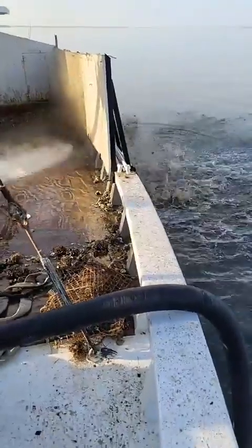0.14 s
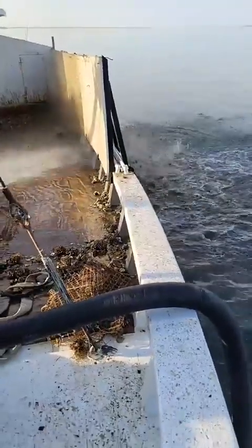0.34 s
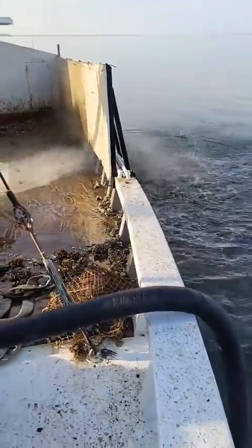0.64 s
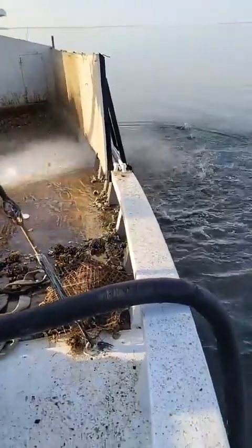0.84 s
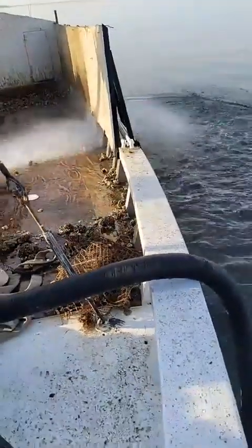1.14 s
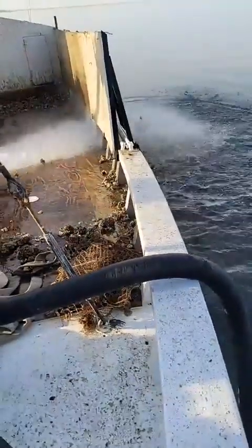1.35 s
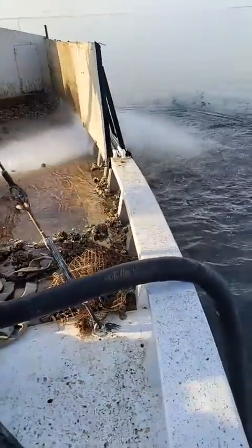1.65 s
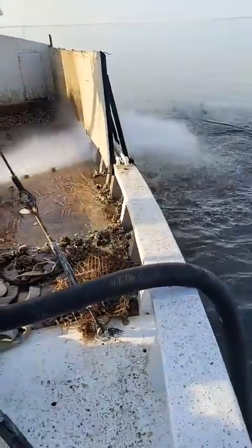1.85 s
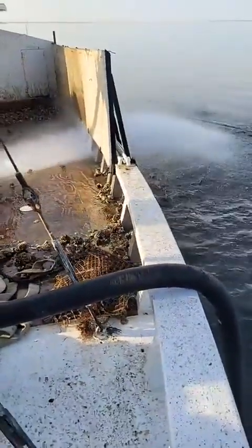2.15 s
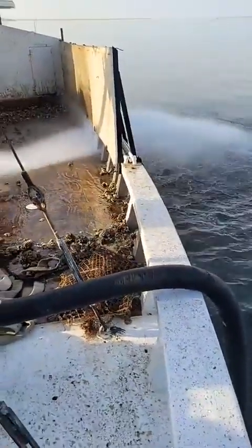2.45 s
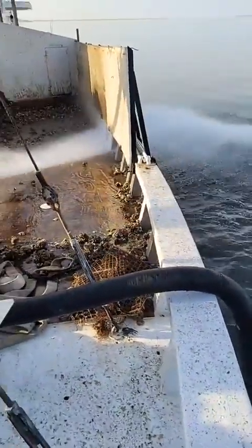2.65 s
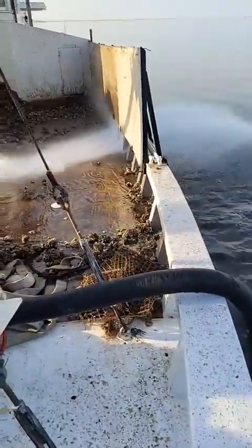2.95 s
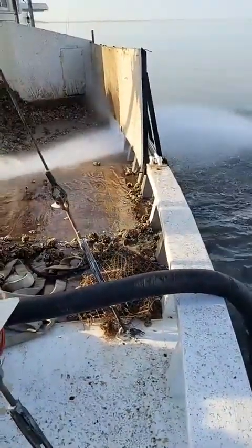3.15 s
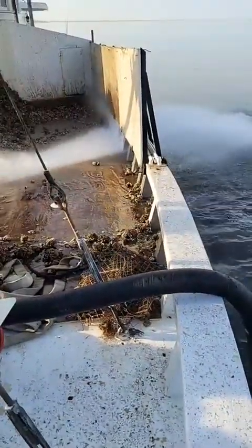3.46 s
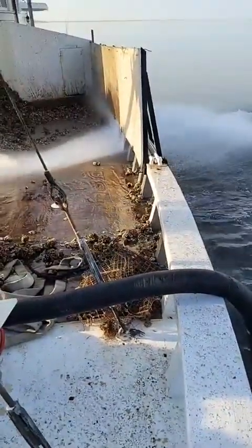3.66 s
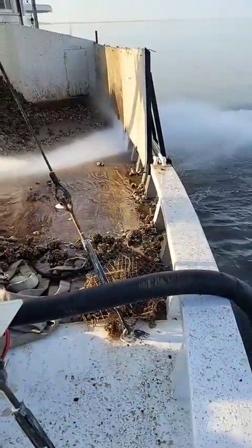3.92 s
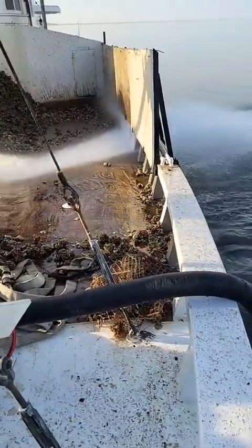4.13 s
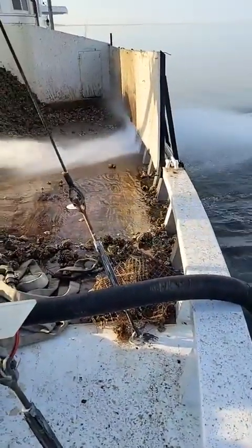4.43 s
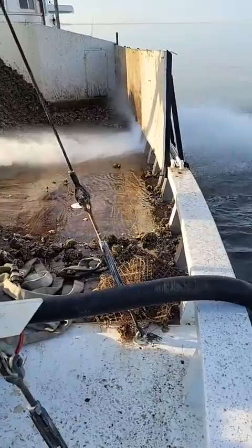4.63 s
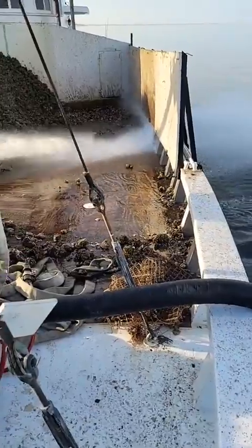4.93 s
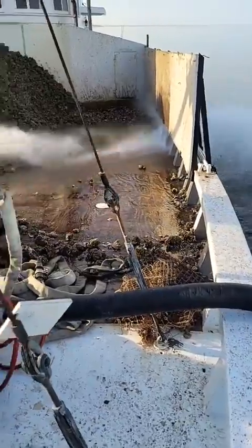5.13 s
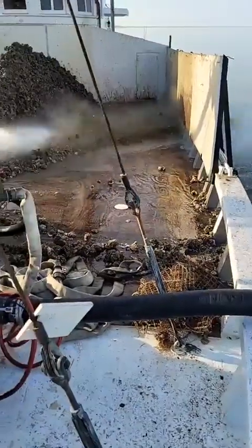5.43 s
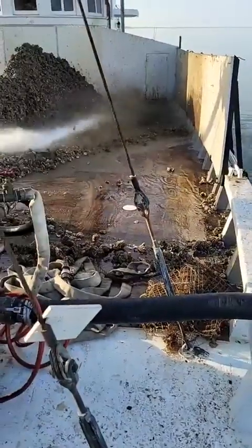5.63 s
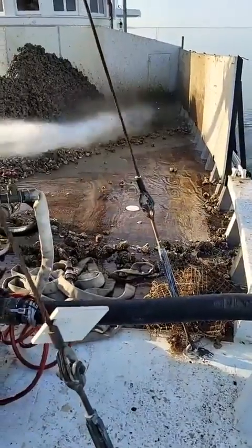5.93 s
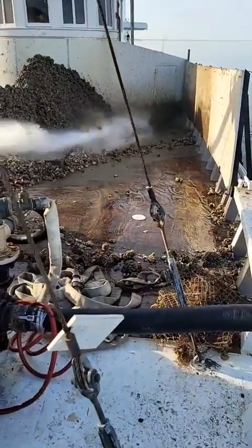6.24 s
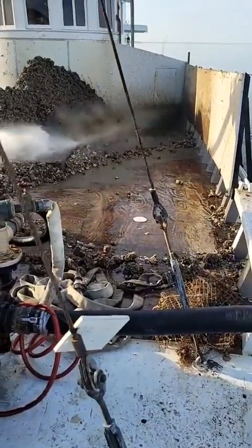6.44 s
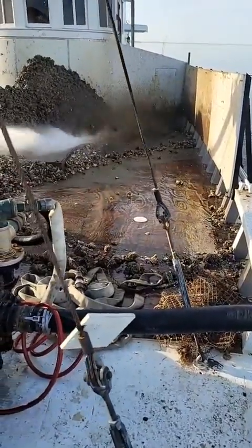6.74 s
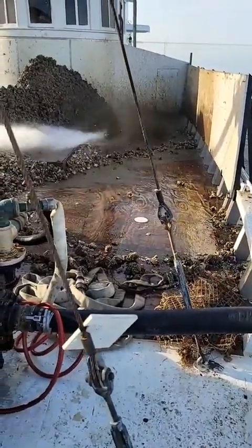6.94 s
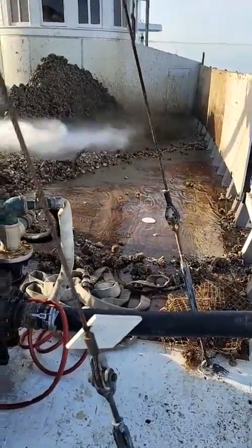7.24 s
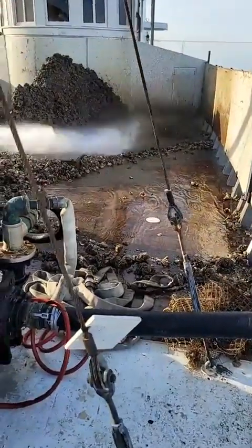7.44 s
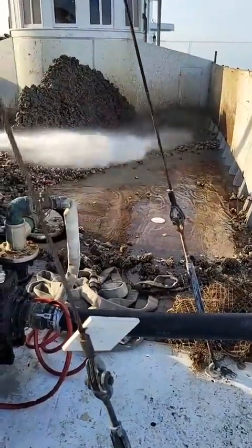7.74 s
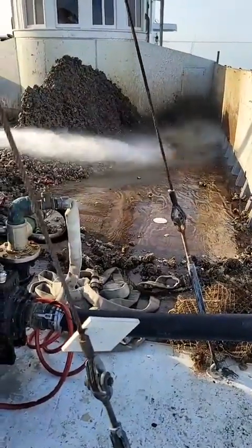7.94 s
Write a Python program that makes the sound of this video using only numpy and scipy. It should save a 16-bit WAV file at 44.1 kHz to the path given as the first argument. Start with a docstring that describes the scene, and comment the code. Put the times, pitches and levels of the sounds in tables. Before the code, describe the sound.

A deck diesel pump sags, surges back to a steady fast throb, while a high-pressure water jet hisses across steel and shells rattle.

```python
"""A four-cylinder diesel drives a deck pump: it sags, recovers to an idle, revs up under load, then runs steadily.
From the start the exhaust throbs in shaft orders, each firing gates the exhaust roar and clatters in the
block, and the water jet hisses across the steel deck in coloured noise that pulses with the pump drive.
After the rev-up a narrow band of noise whistles along the jet, and later a band of grainy noise rises
as the shells swept by the jet rattle over the deck."""
import sys
import numpy as np
from scipy import signal
from scipy.fft import rfft, irfft, next_fast_len
from scipy.io import wavfile
from scipy.ndimage import uniform_filter1d

SR = 44100
rng = np.random.default_rng(int(sys.argv[2]) if len(sys.argv) > 2 else 0)


def decibels_to_gain(level_db):
    """Convert a level in decibels to a linear amplitude gain (20 dB per decade)."""
    exponent = np.asarray(level_db, float) / 20
    return 10 ** exponent


def generate_wav(sig):
    """Save sig (samples, or channels by samples) to the path in sys.argv[1] as 16-bit PCM at SR."""
    pcm = np.round(np.clip(np.atleast_2d(sig).T, -1, 1) * 32767).astype(np.int16)
    wavfile.write(sys.argv[1], SR, pcm)


N = 356328

# Engine speed. Each row: time in seconds, firings a second in Hz.
ENGINE_SPEED = [(0, 55.41), (.08, 52.72), (.34, 42.62), (.4, 39.24), (.5, 43.07), (.65, 46.2), (.8, 46.21),
                (1.19, 45.15), (1.3, 49.46), (1.55, 58.59), (1.7, 62.34), (1.8, 63.04), (2.3, 62.87),
                (3.1, 62.6), (5.4, 62.6), (6.6, 62.42), (8.08, 62.42)]
# Levels of exhaust and jet as heard; both rise together shortly before 3.05 s at a nearly steady speed.
# Each row: time in seconds, exhaust reference level in dB, level of the jet in dB.
HEARD_LEVELS = [(0, -28, -36), (.13, -30, -34), (.4, -32.5, -39.5), (.47, -28.5, -37), (.68, -29, -38.5),
                (.88, -31, -41.5), (1.01, -26, -34.5), (1.1, -23, -34.5), (1.17, -26.5, -34.5),
                (1.24, -19, -26.5), (1.4, -22, -27.5), (1.62, -23.5, -28.5), (1.85, -25, -32.5),
                (2.7, -25, -33), (3.05, -23, -31), (4.9, -23.5, -32.5), (5.3, -23.5, -31),
                (8.08, -23.5, -31.5)]
# The cylinders in firing order. Each row: relative strength of the blow in dB, lateness in firing gaps.
CYLINDERS = [(-7, -.18), (-3.8, -.22), (1.7, -.39), (0, -.37)]
# What the exhaust pipe passes of the firing harmonics. Each row: frequency in Hz, level in dB over the
# exhaust reference, before the load lift and the tilts.
PIPE = [(39, -8), (45, 2.5), (50, 7.5), (56, 8.5), (62, 9.5), (88, 5), (95, 3.5), (102, -8), (111, 2),
        (125, -8.5), (136, -6.5), (149, 1), (165, -4), (187, -5), (197, -12), (228, 2.5), (250, 5.5),
        (270, -3), (312, -10.5), (345, 3), (375, -9.5), (437, -24), (500, -15), (560, -26.5), (625, -16)]
# Orders from unequal cylinders, odd multiples of the engine cycle. Each row: frequency in Hz, level in dB
# over the exhaust reference at full speed, before the load lift and tilt.
PER_CYCLE = [(16, -37), (47, -22), (78, -22), (110, -10), (140, -8.5), (203, -14), (234, -4), (265, -18),
             (297, -10), (330, -10), (360, -21), (420, -18.5), (460, -26.5), (560, -30.5), (610, -19)]
# The same for odd multiples of the shaft turn. Each row: frequency in Hz, level in dB over the reference.
PER_TURN = [(31, -36), (94, -55), (156, -25), (219, -11), (281, -12.5), (344, -11.5), (406, -29.5),
            (470, -22), (600, -33)]
# Unequal orders at low speed. Each row: frequency in Hz, level in dB over the reference, before load lift and tilt.
LUMPY_IDLE = [(30, -28), (56, -11), (75, -27), (105, -14), (150, -15), (190, -19), (235, -13.5),
              (290, -7.5), (350, -8.5), (385, -19), (450, -23)]
# Silencer chambers that delay the orders passing near them. Each row: centre in Hz, half width in Hz.
CHAMBERS = [(70, 45), (227, 65), (381, 43)]
# Colour of the gas roar. Each row: frequency in Hz, relative level in dB per Hz.
ROAR_COLOUR = [(25, -30), (60, -6.5), (110, -1), (190, -6.5), (250, -2.5), (340, 1.5), (420, -10.5),
               (520, -17), (620, -6.5), (700, -7), (765, -3), (810, -10.5), (1200, -15.5), (2500, -35)]
# Colour of the loose block clatter. Each row: frequency in Hz, relative level in dB per Hz.
BLOCK_COLOUR = [(470, -24), (800, -2), (1110, -1.5), (1680, 1), (1840, -3.5), (2090, -3.5), (3210, -14),
                (6110, -15), (7000, -36), (9100, -67), (15400, -120)]
# Ringing parts of the block. Each row: centre in Hz, width in Hz, gain at the centre in dB.
BLOCK_RINGS = [(1184, 41, -12.5), (1688, 114, 3), (2124, 130, -1.5), (4280, 130, -1)]
# Strongest orders that repeat in the clatter. Each row: multiple of the engine cycle, peak in dB over the block.
REPEATING_CLATTER = [(41, -10.5), (44, -12.5), (49, -14), (55, -13.5), (59, -15), (67, -14.5), (68, -20.5),
                     (75, -14), (77, -16.5), (83, -20), (88, -12.5), (93, -14), (109, -14), (126, -15),
                     (130, -13), (136, -19.5)]
# Treble balance of the hiss as heard, with two dips, near 7.4 and 14 kHz, that are not the jet's own.
# Each row: frequency in Hz, relative level in dB per Hz.
HEARD_HISS = [(1350, -27), (2300, -2.5), (3250, -7), (3700, -7.5), (4000, -7.5), (4300, -7), (6080, -11),
              (6750, -14), (7380, -23.5), (9390, -13), (11600, -15.5), (13900, -29), (15100, -22),
              (15700, -19)]
# Details around the jet. Each row: time in seconds, whistle near the nozzle in dB, rattle of swept shells in dB.
WHISTLE_AND_SHELLS = [(0, -62, -52), (1.7, -58, -52), (2.1, -43, -55), (4.9, -46, -45), (5.3, -43, -43),
                      (5.7, -53, -40), (7, -57, -43), (8.08, -57, -42)]
# Faint orders of valve-gear noise, in multiples of the engine cycle: the first, and one past the last.
FAINT_ORDERS = (42, 150)

ORDER_COUNT = 40  # exhaust orders, in multiples of the engine cycle
IDLE_DULL_DB = -2  # per octave: firing harmonics fade at low speed
PULL_BRIGHT_DB = 0.5  # per octave, while the engine pulls
BLOCK_DB = -4.5  # block clatter over the exhaust reference
FAINT_DB, FAINT_SCATTER_DB, FAINT_FALL_DB = -23, 3, -3  # peak over the block; scatter; fall per octave


def unit(x):
    """Scaled to rms 1."""
    return x / np.sqrt(np.mean(x ** 2) + 1e-20)


def curves(rows):
    """One value per sample for each column after the time."""
    s, *cols = np.transpose(rows)
    return [np.interp(np.arange(N) / SR, s, c) for c in cols]


def along(points, hz):
    """(Hz, value) points read on a log axis."""
    f, v = np.transpose(points)
    return np.interp(np.log(hz + 1), np.log(f + 1), v)


def wobble(rate):
    """A random curve, rate knots a second."""
    knots = rng.standard_normal(int(N * rate / SR) + 2)
    return np.interp(np.arange(N) * rate / SR, np.arange(len(knots)), knots)


def filtered(x, response):
    """x passed through a complex response of frequency."""
    m = next_fast_len(N + 8192)
    return irfft(rfft(x, m) * response(np.fft.rfftfreq(m, 1 / SR)), m)[:N]


def rush(spectrum, patchy_db):
    """Coloured noise of rms 1 with patches of random gain over time and frequency."""
    z = signal.stft(rng.standard_normal(N), nperseg=512)[2]
    field = uniform_filter1d(rng.standard_normal(z.shape), size=6, axis=0)
    field = uniform_filter1d(field, size=10, axis=1)
    x = signal.istft(z * decibels_to_gain(patchy_db * unit(field)), nperseg=512)[1][:N]
    return unit(filtered(x, lambda hz: decibels_to_gain(along(spectrum, hz))))


def firings():
    """Firings counted along the engine's turning, and the firing rate in Hz."""
    rate = curves(ENGINE_SPEED)[0]
    return np.cumsum(rate) / SR + 3.65, rate  # starts part-way through a cycle


def load():
    """0 when coasting or steady, near 1 while the engine pulls itself up to speed."""
    pull = uniform_filter1d(np.gradient(firings()[1]) * SR, size=3000)
    return np.clip(pull / 25, 0, 1)


def gate(lead, sharp, scatter_db, uneven):
    """A swell on every firing: quick rise, slower fall, new size each time."""
    turn = firings()[0] + lead
    which, part = turn.astype(int), turn % 1
    size_db = scatter_db * rng.standard_normal(which[-1] + 1)[which]
    blow_db = np.transpose(CYLINDERS)[0]
    size_db = size_db + uneven * blow_db[which % len(CYLINDERS)]
    return unit(decibels_to_gain(size_db) * part * np.exp(-sharp * part) * (1 - part))


def exhaust():
    """Shaft orders through the pipe; unequal cylinders fill the orders between firing harmonics and set timing."""
    turn, rate = firings()
    exhaust_db = curves(HEARD_LEVELS)[0]
    fast = np.clip((rate - 47) / 14, 0, 1)  # 0 at idle, 1 at full speed
    blow_db, late = np.transpose(CYLINDERS)
    count = len(CYLINDERS)
    out, pull = np.zeros(N), load()
    for k in range(1, ORDER_COUNT + 1):
        is_firing = k % count == 0
        order_hz = k * rate / count
        family = PIPE if is_firing else PER_CYCLE if k % 2 else PER_TURN
        passed_db = along(family, order_hz)
        if not is_firing:
            passed_db = fast ** 2 * passed_db + (1 - fast ** 2) * along(LUMPY_IDLE, order_hz)
        tilt_db = is_firing * IDLE_DULL_DB * (1 - fast) + PULL_BRIGHT_DB * pull
        db = exhaust_db + passed_db + 0.43 * pull + tilt_db * np.log2(max(k / count, 1))
        # the late, unequal blows add up to one phase for this order
        blows = decibels_to_gain(blow_db) * np.exp(-2j * np.pi * k * (np.arange(count) + late) / count)
        timing = np.angle(np.sum(blows))
        timing = timing - sum(2 * np.arctan((order_hz - hz) / width) for hz, width in CHAMBERS)
        # at low speed each blow-down is drawn out, its higher orders trailing
        timing = timing - .035 * (1 - fast ** 2) * k * k
        # higher orders are less steady; their level wavers more at low speed
        shake = np.sqrt(k / 16)
        timing = timing + .13 * shake * wobble(9)
        waver_db = (0.1 + 1.4 * (1 - fast)) * shake * wobble(12)
        out += decibels_to_gain(db + waver_db) * np.sin(2 * np.pi * k * turn / count + timing)
    return np.sqrt(2) * out


def roar():
    """Turbulent gas in the pipe, puffing with each firing."""
    puffs = 0.82 + 0.5 * gate(lead=0.22, sharp=1.74, scatter_db=1.5, uneven=0.05)
    gas = unit(puffs * rush(ROAR_COLOUR, patchy_db=1.6))
    return decibels_to_gain(curves(HEARD_LEVELS)[0] - 1.0) * gas


def block_modes(hz):
    """Response of the block: a plain path plus ringing parts of alternating sign."""
    response = 0.59
    for k, (centre, width, db) in enumerate(BLOCK_RINGS):
        ring = 1j * hz * width / (centre * centre - hz * hz + 1j * hz * width)
        response = response + (-1) ** k * decibels_to_gain(db) * ring
    return response


def faint_clatter(cycle):
    """One random cycle of small valve-gear noises, played over and over."""
    k = np.arange(*FAINT_ORDERS)
    scatter, phase = rng.standard_normal(len(k)), rng.uniform(0, 2 * np.pi, len(k))
    level_db = FAINT_DB + FAINT_SCATTER_DB * scatter + FAINT_FALL_DB * np.log2(k / k[0])
    size = 4096  # points in the cycle
    lines = np.zeros(size // 2 + 1, complex)
    lines[k] = decibels_to_gain(level_db) * np.exp(1j * phase)
    table = irfft(lines, size) * size / 2
    angle = np.arange(size) * 2 * np.pi / size
    return np.interp(cycle + 0.0055 * wobble(12), angle, table, period=2 * np.pi)


def block():
    """Combustion knock and valve clatter just ahead of each exhaust pulse; part of it repeats every cycle."""
    # hard pulling adds a short, sharp diesel knock
    sharp_knock = 0.6 * load() * gate(lead=0.12, sharp=14, scatter_db=4, uneven=.1)
    knocks = 1.5 + gate(lead=0.44, sharp=3.0, scatter_db=1.5, uneven=0.12) + sharp_knock
    knocks = knocks * decibels_to_gain(1.7 * wobble(500))
    loose = decibels_to_gain(-1.5) * unit(filtered(knocks * rush(BLOCK_COLOUR, patchy_db=0.87), block_modes))
    cycle = 2 * np.pi * firings()[0] / len(CYLINDERS)
    repeating = np.zeros(N)
    for k, db in REPEATING_CLATTER:
        level = decibels_to_gain(db + 1.7 * wobble(6))
        phase = rng.uniform(0, 2 * np.pi) + 0.55 * wobble(12)
        repeating += level * np.cos(round(k) * cycle + phase)
    clatter = loose + repeating + faint_clatter(cycle)
    return decibels_to_gain(curves(HEARD_LEVELS)[0] + BLOCK_DB) * clatter


def jet():
    """The jet's hiss, pulsing with the pump drive, gritty with thrown shells and drops."""
    pulse = 1.35 + 0.62 * gate(lead=0.36, sharp=2.5, scatter_db=3.5, uneven=0.11)
    pulse = pulse + 0.48 * load() * gate(lead=0.11, sharp=11, scatter_db=2.0, uneven=.1)
    grit = decibels_to_gain(1.3 * wobble(2500) + 0.42 * wobble(8.3) + 0.35 * wobble(40))
    hiss = unit(pulse * grit * rush(HEARD_HISS, patchy_db=0.95))
    return decibels_to_gain(curves(HEARD_LEVELS)[1]) * hiss


def whistle():
    """Air torn along the jet sings in a narrow band."""
    band = lambda hz: 1 / (1 + ((hz - 4030) / 80) ** 4)
    tone = unit(filtered(rng.standard_normal(N), band))
    return decibels_to_gain(curves(WHISTLE_AND_SHELLS)[0] + 1.3 * wobble(9.7)) * tone


def shells():
    """Shells rattle densely over the deck, louder once the jet bites into the heap."""
    band = lambda hz: 1 / (1 + ((hz - 2600) / 450) ** 4)
    grains = decibels_to_gain(4.2 * wobble(300) + 1.5 * wobble(12)) * rng.standard_normal(N)
    return decibels_to_gain(curves(WHISTLE_AND_SHELLS)[1]) * unit(filtered(grains, band))


def scene():
    """Engine and jet in open air."""
    return (exhaust() + roar() + block() + jet() + whistle() + shells())[None]


def band_limit(x):
    """A steep low-pass at the top of the band."""
    return signal.sosfilt(signal.butter(12, 15900, fs=SR, output="sos"), x)


def record(dry):
    """A small microphone: peaks saturate softly, then the top is cut off sharply."""
    saturated = dry / (1 + np.abs(dry / .98) ** 6) ** (1 / 6)
    mix = filtered(saturated[0], lambda hz: hz < 15760)[None]
    return band_limit(mix)


dry = scene()
out = record(dry)
generate_wav(out)
```